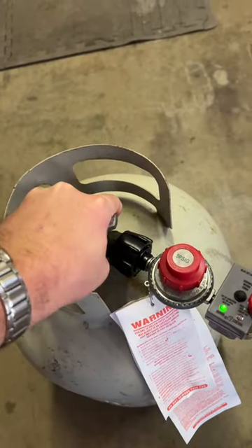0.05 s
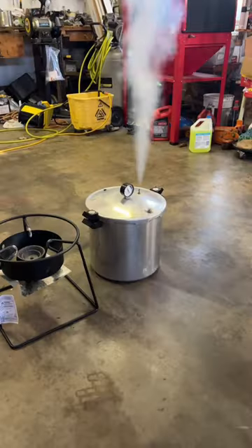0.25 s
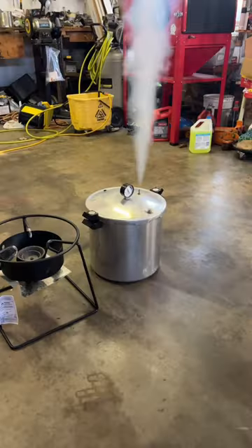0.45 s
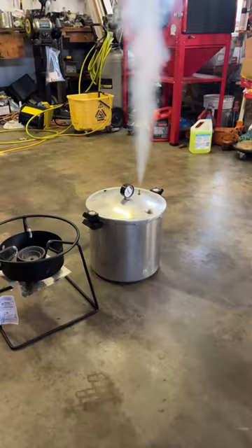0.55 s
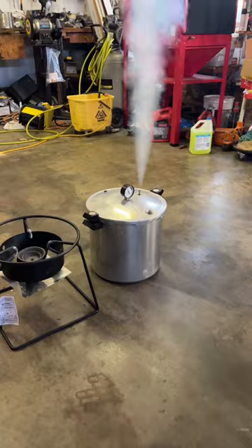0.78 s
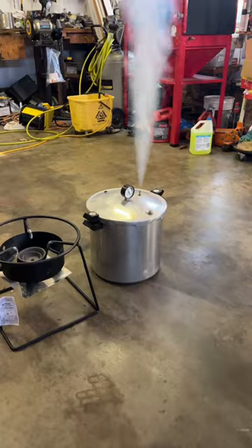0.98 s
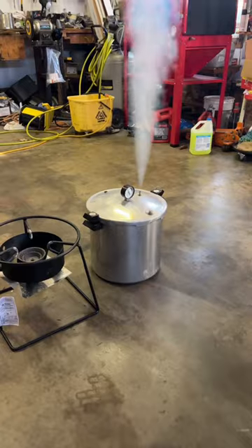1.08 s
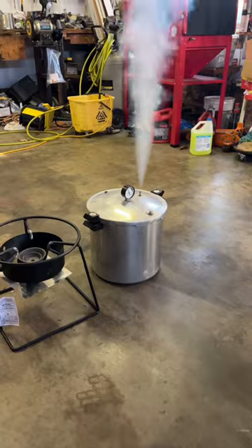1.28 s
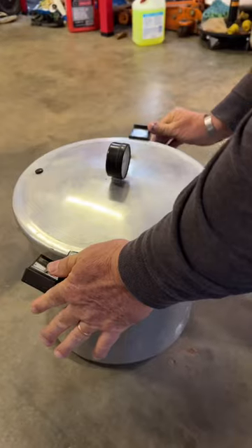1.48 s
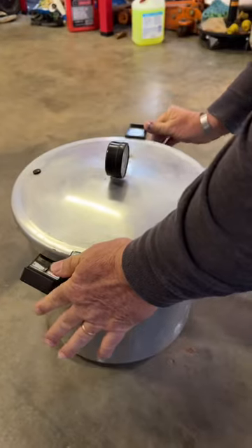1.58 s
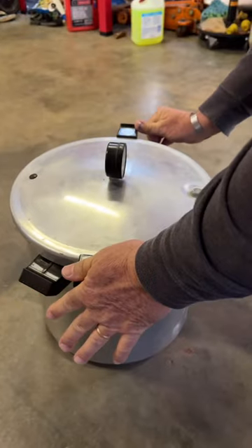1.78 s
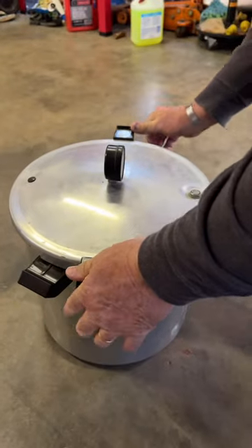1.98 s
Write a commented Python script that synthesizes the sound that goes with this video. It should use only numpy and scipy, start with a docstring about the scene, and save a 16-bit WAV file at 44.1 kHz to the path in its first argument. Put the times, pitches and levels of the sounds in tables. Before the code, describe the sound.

A loud, bright hiss of steam from a pressure canner vent fills a garage for about a second. Faint gas valve squeaks come before it; afterward, close by, the lid slides and knocks softly while the pot rings faintly.

```python
"""Faint squeaks and a couple of knocks come first, as a hand turns the valve of a gas bottle in a
garage with a concrete floor. Hard cut to steam jetting from the vent of a pressure canner at full,
steady force: a bright, turbulent hiss over a low roar. Hard cut again to hands gripping the pot and
twisting its lid, which slides on the rim with soft bumps, ticks and a squeak while the pot rings faintly."""
import sys
import numpy as np
from scipy import signal
from scipy.fft import rfft, irfft
from scipy.io import wavfile
from scipy.ndimage import map_coordinates

SR = 44100
rng = np.random.default_rng(int(sys.argv[2]) if len(sys.argv) > 2 else 0)


def log_audio(samples):
    """Write samples as a 16-bit WAV file to the path given in sys.argv[1]."""
    # one column per channel
    frames = np.atleast_2d(samples).T
    # limit to full scale, then quantise
    limited = np.clip(frames, -1, 1)
    pcm = np.round(limited * 32767).astype(np.int16)
    wavfile.write(sys.argv[1], SR, pcm)


N = 90404
TIME = np.arange(N) / SR
FREQ = np.maximum(np.arange(N // 2 + 1) * SR / N, 1)
SIDES = np.array([[1], [-1]])  # left, right
JET_START_S, JET_END_S = 0.217, 1.38
KNOCK_ATTACK_S = 0.00077

# Stereo image of the quiet sounds: freq_hz, coherence (0-1), left_lead_rad, left_over_right_db
ROOM_IMAGE = [(60, .99, 0, .2), (130, .94, 0, .5), (280, .88, 0, 1.3), (650, .5, 0, 4.2),
              (1400, .45, 0, 2.5), (3100, .15, 0, .5), (6800, .45, 0, .3), (10000, .4, -1.5, 0),
              (12500, 1, -3.14, 0)]


def from_db(db):
    """Decibels to gain."""
    return 10 ** (np.asarray(db) / 20)


def unit_rms(x):
    """Scale to unit power."""
    return x / np.sqrt(np.mean(x ** 2) + 1e-20)


def automation(points):
    """A curve through (time, value) points, at every sample."""
    return np.interp(TIME, *np.transpose(points))


def over_freq(rows):
    """Each column of a table, interpolated along log frequency."""
    hz, *columns = np.transpose(rows)
    return [np.interp(np.log(FREQ), np.log(hz), column) for column in columns]


def eq_curve(points):
    """Gain at every frequency from (Hz, dB) points."""
    return from_db(over_freq(points)[0])


def resonance(hz, width_hz):
    """Gain curve of a steep-sided resonance."""
    return 1 / (1 + ((FREQ ** 2 - hz ** 2) / (FREQ * width_hz)) ** 2)


def drift(rate_hz):
    """Smooth random wander at unit power."""
    pole = np.exp(-2 * np.pi * rate_hz / SR)
    wander = signal.lfilter([1], [1, -2 * pole, pole * pole], rng.standard_normal(N + SR))
    return unit_rms(wander[SR:])


def stroke(start_s, length_s):
    """A rounded swell and fade."""
    progress = np.clip((TIME - start_s) / length_s, 0, 1)
    return np.sqrt(np.abs(np.sin(np.pi * progress)))


def strike(age, t60_s):
    """A fast attack and an exponential decay."""
    return (1 - np.exp(-age / KNOCK_ATTACK_S)) * from_db(-60 * age / t60_s)


def stereo_noise(gain, image=ROOM_IMAGE):
    """Coloured noise at unit power, partly shared between left and right."""
    coherence, lead_rad, pan_db = over_freq(image)
    white = rfft(rng.standard_normal((3, N)))
    shared = np.sqrt(coherence) * white[0] * np.exp(.5j * lead_rad * SIDES)
    diffuse = np.sqrt(1 - coherence) * white[1:]
    return unit_rms(irfft((shared + diffuse) * gain * from_db(.5 * pan_db * SIDES), N))


def garage_ripple(wall_gain=0.37, wall_span_s=.035):
    """Comb-like colour that near surfaces and many wall reflections put on a steady sound."""
    # Near reflections: delay_s, gain
    echoes = [(.00128, .07), (.00201, .04)]
    delays_s = (.07 + rng.random(80) ** 2) * wall_span_s
    gains = rng.standard_normal(80)
    paths = np.zeros(N)
    paths[(delays_s * SR).astype(int)] = wall_gain * gains / np.linalg.norm(gains)
    paths[0] = 1  # direct sound
    for delay_s, gain in echoes:
        paths[int(delay_s * SR)] += gain
    return abs(rfft(paths))


def room_tone(bottle_db=-50, pot_db=-58):
    """Low room noise before and after the jet, brighter beside the gas bottle."""
    # Air around the bottle: freq_hz, gain_db
    bottle_eq = [(25, -6), (60, -2.5), (125, 4), (200, .5), (650, -1), (1400, -3.5), (2100, -17.5),
                 (4300, -16.5), (7000, -20), (10000, -33.5), (12000, -24.5), (16000, -36.5)]
    # Air around the pot: freq_hz, gain_db
    pot_eq = [(25, -23), (65, -1), (150, -14.5), (420, -9.5), (650, -17), (950, -21.5), (1400, -14),
              (2000, -30.5), (3300, -27), (5000, -58), (10000, -44.5), (16000, -38)]
    bottle = from_db(bottle_db) * stereo_noise(eq_curve(bottle_eq))
    pot = from_db(pot_db) * stereo_noise(eq_curve(pot_eq) * garage_ripple())
    return (TIME < JET_START_S) * bottle + (TIME > JET_END_S) * pot


def squeaks(rough_db=2.5, slip_rate_hz=130):
    """Stick-slip chirps, unsteady in pitch and level, as the valve or the lid turns."""
    # Four valve squeaks, two lid squeaks: start_s, length_s, start_hz, end_hz, level_db, jitter_ratio
    chirps = [(0.034, 0.034, 1040, 1048, -54, .008), (0.078, 0.056, 1285, 1305, -56.5, .02),
              (0.116, 0.024, 1390, 1445, -54, .025), (0.138, 0.03, 1480, 1420, -60, .02),
              (1.845, .016, 680, 760, -55, .05), (1.868, .024, 770, 870, -53.5, .03)]
    out = np.zeros(N)
    for start_s, length_s, start_hz, end_hz, level_db, jitter in chirps:
        glide_hz = automation([(start_s, start_hz), (start_s + length_s, end_hz)])
        pitch_hz = glide_hz * (1 + jitter * drift(slip_rate_hz))
        tone = np.sin(2 * np.pi * np.cumsum(pitch_hz) / SR)
        rasp = from_db(rough_db * drift(slip_rate_hz))
        out += from_db(level_db) * stroke(start_s, length_s) * unit_rms(tone * rasp)
    return out


def knocks(noise_gain=0.72, width_ratio=1.2):
    """Each contact is a quickly dying tone, roughened by noise around its pitch."""
    # Bumps and clicks of hands, valve and lid: start_s, level_db, pitch_hz, t60_s
    contacts = [(.128, -43.5, 654, 0.037), (.171, -47.5, 118, 0.12), (1.379, -37.5, 395, 0.069),
                (1.392, -37.5, 292, 0.071), (1.404, -43.5, 502, 0.27), (1.445, -48, 91, .15),
                (1.478, -47, 169, 0.18), (1.493, -41.5, 315, 0.069), (1.553, -40.5, 400, 0.031),
                (1.557, -40.5, 72, 0.15), (1.569, -42.5, 171, 0.068), (1.591, -30.5, 230, 0.064),
                (1.596, -39, 71, .08), (1.616, -34, 150, 0.017), (1.628, -44, 260, 0.012),
                (1.675, -46.5, 1820, 0.017), (1.847, -41, 686, 0.038), (1.877, -54.5, 1530, 0.082),
                (1.904, -53.5, 73.4, 0.16), (2.024, -48.5, 358, 0.076), (2.026, -54, 716, .06),
                (2.045, -56, 3270, 0.031)]
    tone_gain = np.sqrt(2 * (1 - noise_gain ** 2))  # tone and noise add up to unit power
    out = np.zeros((2, N))
    for start_s, level_db, pitch_hz, t60_s in contacts:
        age = np.maximum(TIME - start_s, 0)
        tone = tone_gain * np.sin(2 * np.pi * pitch_hz * age)
        grit = noise_gain * stereo_noise(resonance(pitch_hz, width_ratio * pitch_hz))
        out += from_db(level_db) * strike(age, t60_s) * (tone + grit)
    return out


def band_flicker(hiss, depth_db=1.34, rate_hz=13.93, band_hz=272):
    """Narrow bands of the hiss swell and sink slightly, at random."""
    hz, times_s, cells = signal.stft(hiss, SR, nperseg=512)
    grid = np.meshgrid(hz / band_hz, times_s * rate_hz, indexing="ij")
    swell = map_coordinates(rng.standard_normal((256, 128)), grid, order=3, mode="wrap")
    _, flickering = signal.istft(cells * from_db(depth_db * swell), SR, nperseg=512)
    return unit_rms(flickering[:, :N])


def steam_jet(roar_top_hz=2050, flutter_db=.2, wisp_s=.013, wisp_db=-9, wisp_fall_db_per_s=801):
    """Bright turbulence from the vent over a heaving roar; it cuts in, then cuts out with a brief wisp."""
    # Colour of the hiss: freq_hz, gain_db
    hiss_eq = [(30, -33), (70, -23.5), (130, -22.2), (185, -17.3), (330, -21), (580, -17.3), (850, -16.3),
               (1250, -18.9), (1550, -16.1), (1850, -16.2), (2200, -11.8), (2650, -10.9), (3100, -7.3),
               (3500, -7.9), (4050, -6.2), (4600, -6.2), (5150, -7.3), (5600, -7.7), (6100, -8.4),
               (6700, -8.8), (7600, -6.4), (8300, -5.6), (9000, -6.2), (9450, -5.4), (10150, -7.5),
               (11000, -2.2), (11700, -.3), (12400, -2.5), (14000, -2.5), (15600, -3.8)]
    # Stereo image of the jet: freq_hz, coherence (0-1), left_lead_rad, left_over_right_db
    jet_image = [(100, 0.97, 0, 0.3), (280, .88, .1, 1.2), (520, 0.6, 0.3, 2.8), (900.0, 0.1, 0.8, 4.1),
                 (1700.0, 0.54, -0.1, 1.7), (2300.0, 0.05, -1.7, 0.8), (2800.0, 0.32, -2.8, 1.8),
                 (3400.0, 0.29, -1.3, 0.6), (4100.0, 0.65, -0.55, 1.0), (5050.0, 0.25, -2.5, 1.4),
                 (5600, 0.3, 0.1, -0.2), (5900, .78, 0, 0), (6500.0, 0.98, 0, 0), (7400.0, 0.98, 0, 0),
                 (7800, .75, -.4, 0), (8500.0, 0.68, -0.8, -0.0), (10000.0, 0.61, -1.5, 0.0),
                 (11400.0, 0.83, -2.2, -0.1), (12000, 0.88, -2.6, 0), (12520, 1, -3.14, 0)]
    # Swell and sag of the low roar: time_s, gain_db
    roar_ride = [(.22, -0.5), (.33, 2.5), (.5, 0), (.8, -2), (1.1, 1), (1.33, -0.5)]
    # Force of the jet, with a last surge: time_s, level_db
    flow = [(.217, -21.9), (.9, -21.8), (1.285, -21.4), (1.3, -20.4), (1.38, -20.8)]
    hiss = band_flicker(stereo_noise(eq_curve(hiss_eq) * garage_ripple(), jet_image))
    roar = irfft(rfft(hiss) / (1 + (FREQ / roar_top_hz) ** 4), N)
    jet = hiss - roar + roar * from_db(automation(roar_ride))
    level_db = automation(flow) + flutter_db * drift(rate_hz=3)
    wisp = from_db(wisp_db - wisp_fall_db_per_s * np.maximum(TIME - JET_END_S, 0))
    gate = np.select([TIME < JET_START_S, TIME < JET_END_S, TIME < JET_END_S + wisp_s], [0, 1, wisp], 0)
    return gate * from_db(level_db) * jet


def lid_slide(grain_db=0.5, grain_rate_hz=72):
    """Grainy friction of the lid on the rim."""
    # Push and ease of the twist: time_s, level_db
    twist = [(1.38, -49), (1.46, -55), (1.53, -47.5), (1.565, -46.5), (1.615, -44.5), (1.66, -51),
             (1.72, -58.5), (1.83, -64), (1.88, -54), (1.94, -65)]
    # Colour of the friction: freq_hz, gain_db
    friction_eq = [(30, -8), (70, 3.5), (250, 2), (600, -1.5), (1000, -7), (1400, -5), (2200, -10.5),
                   (4000, -14), (4850, -20), (6000, -15), (7400, -21.5), (10000, -28.5), (16000, -20)]
    level_db = automation(twist) - grain_db * drift(grain_rate_hz)
    friction = stereo_noise(eq_curve(friction_eq) * garage_ripple())
    return (TIME > JET_END_S) * from_db(level_db) * friction


def lid_ticks(attack_s=0.00025, tail_db=-25, tail_t60_s=0.1):
    """Dry ticks with a short tail, as the lid catches and lets go on the rim."""
    # Catches of the lid: start_s, level_db, t60_s
    catches = [(1.559, -47.5, .02), (1.5715, -37.5, .012), (1.5825, -45, .012), (1.5895, -45.5, .014),
               (1.5925, -45, .014), (1.611, -49, .015), (1.6215, -50, .012), (1.6745, -51.5, .014),
               (1.732, -59, .012), (1.802, -59, .08)]
    # Colour of a tick: freq_hz, gain_db
    tick_eq = [(200, -14), (900, -2), (1700, 0), (3500, -4), (5000, -11), (7300, -8), (10000, -19),
               (13000, -30), (16000, -45)]
    envelope = np.zeros(N)
    for start_s, level_db, t60_s in catches:
        age = np.maximum(TIME - start_s, 0)
        attack = 1 - np.exp(-age / attack_s)
        snap = from_db(-60 * age / t60_s)
        tail = from_db(tail_db - 60 * age / tail_t60_s)
        envelope += from_db(level_db) * attack * np.hypot(snap, tail)
    return envelope * stereo_noise(eq_curve(tick_eq))


def lid_scuffs(centre_hz=6000, width_hz=1800):
    """Tiny bright scuffs where metal drags on metal."""
    # Drags of the lid: start_s, length_s, level_db
    drags = [(1.604, 0.0068, -55), (1.615, 0.0094, -55), (1.878, .014, -71)]
    envelope = sum(from_db(level_db) * stroke(start_s, length_s) for start_s, length_s, level_db in drags)
    return envelope * stereo_noise(resonance(centre_hz, width_hz))


def pot_ring(waver_db=2.5, left_over_right_db=2):
    """The pot's modes ring on unevenly after the firmer blows, a little to the left."""
    # Modes of the pot: pitch_hz, level_db, t60_s
    modes = [(243.4, -47, 0.51), (394, -59, 11), (606, -60, 2.1), (647, -67.5, 1.8), (824, -69, 1.8),
             (1370, -63, 2.4), (1550, -74, 1.4), (2760, -73, 1.8), (3120, -75, 3.5)]
    # Blows that set it ringing: start_s, gain_db
    blows = [(1.592, 0), (1.87, -15.5)]
    out = np.zeros((2, N))
    for start_s, blow_db in blows:
        age = np.maximum(TIME - start_s, 0)
        for pitch_hz, mode_db, t60_s in modes:
            phase = rng.uniform(0, 2 * np.pi) + rng.normal(0, 0.63, (2, 1))  # offset per side, for width
            level_db = mode_db + blow_db - waver_db * drift(rate_hz=12)
            out += from_db(level_db) * strike(age, t60_s) * np.sin(2 * np.pi * pitch_hz * age + phase)
    return out * from_db(.5 * left_over_right_db * SIDES)


def scene():
    """The loud jet between the quiet valve and lid sounds, which sit on room tone."""
    foreground = steam_jet() + squeaks() + lid_slide() + lid_ticks() + lid_scuffs() + knocks()
    return foreground + pot_ring() + room_tone()


def record(dry, low_cut_hz=36, high_cut_hz=15750):
    """Roll off the deep bass and cut the top steeply."""
    low_cut = signal.butter(5, low_cut_hz, "high", fs=SR, output="sos")
    high_cut = signal.ellip(12, .1, 80, high_cut_hz, fs=SR, output="sos")
    return signal.sosfilt(high_cut, signal.sosfilt(low_cut, dry))


dry = scene()
out = record(dry)
log_audio(out)
```